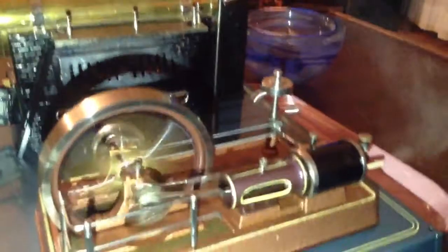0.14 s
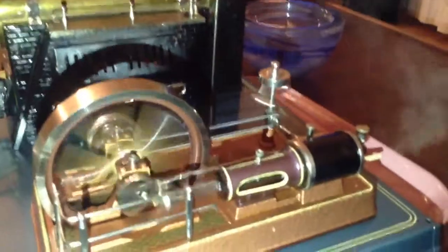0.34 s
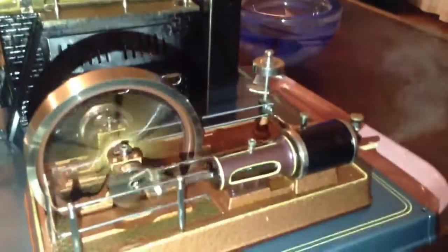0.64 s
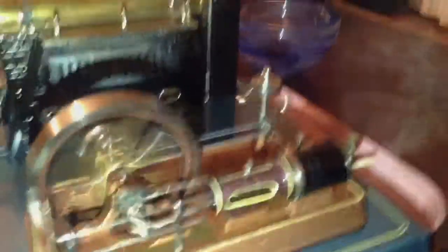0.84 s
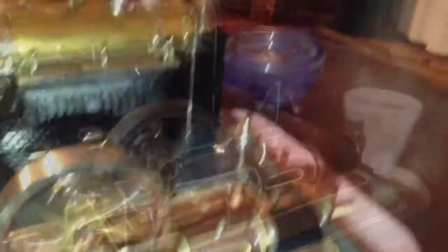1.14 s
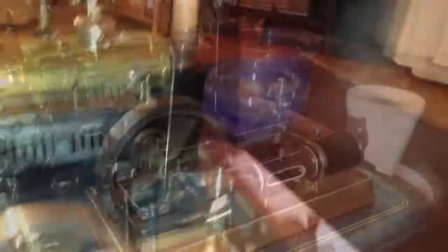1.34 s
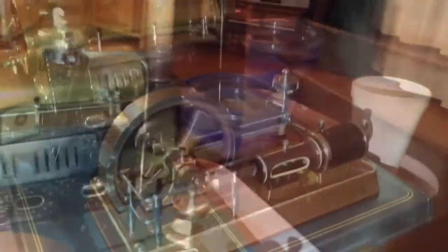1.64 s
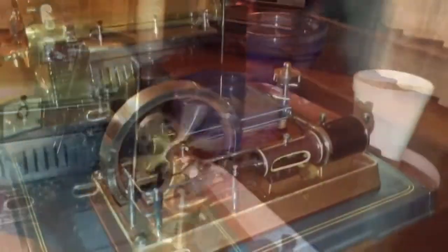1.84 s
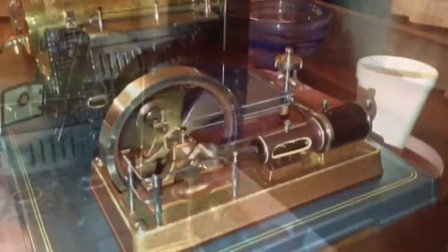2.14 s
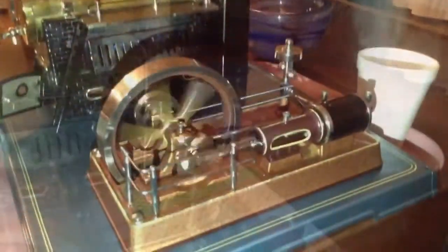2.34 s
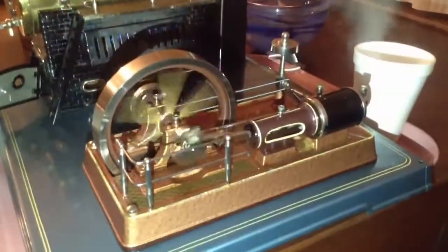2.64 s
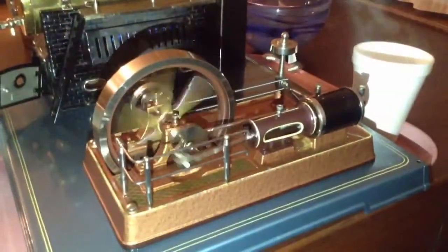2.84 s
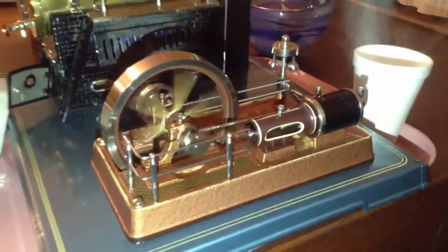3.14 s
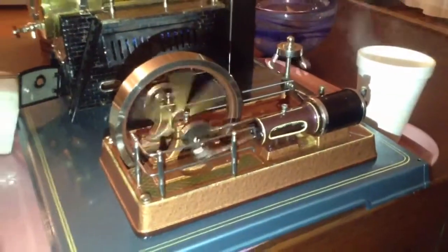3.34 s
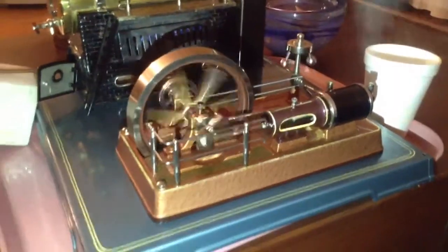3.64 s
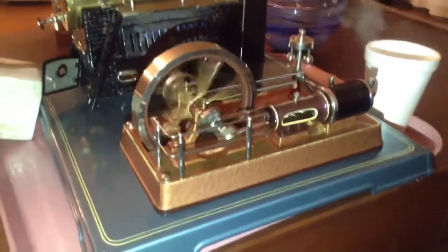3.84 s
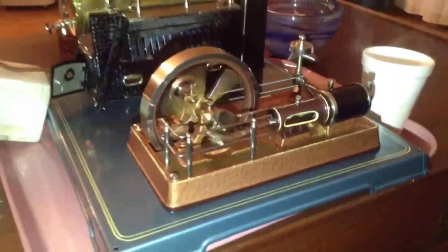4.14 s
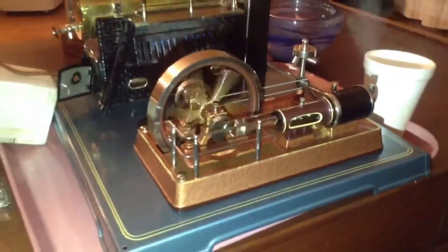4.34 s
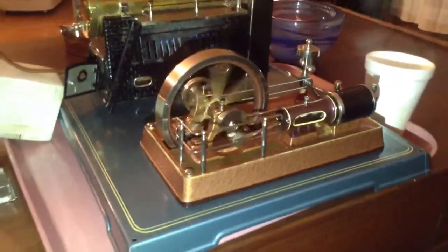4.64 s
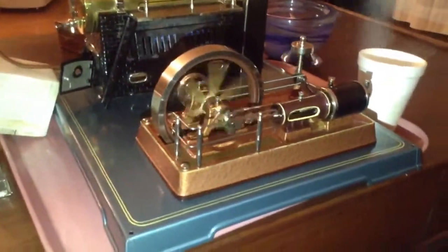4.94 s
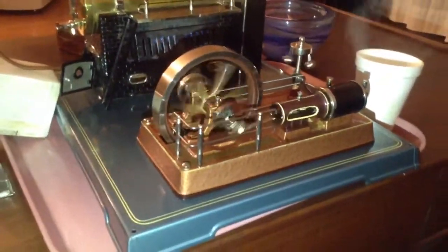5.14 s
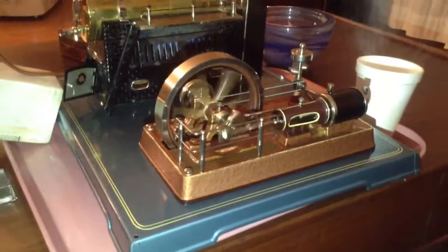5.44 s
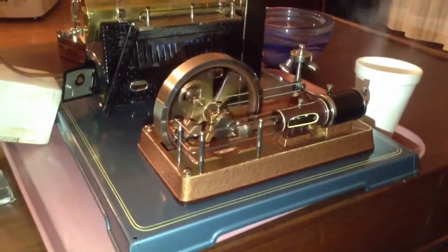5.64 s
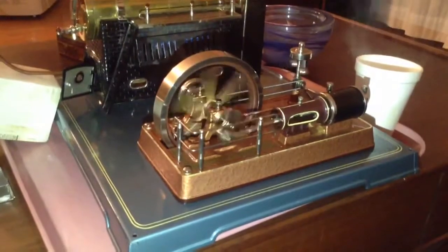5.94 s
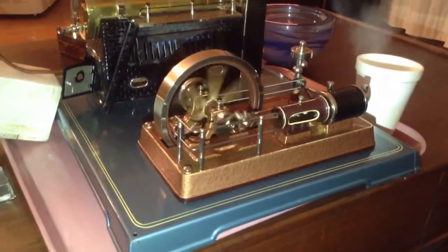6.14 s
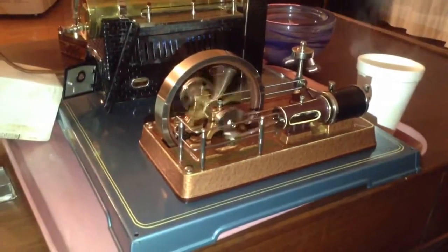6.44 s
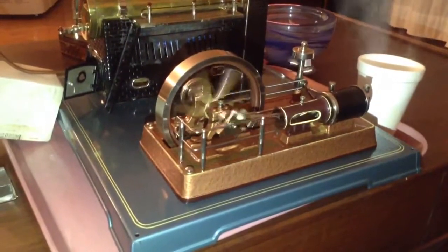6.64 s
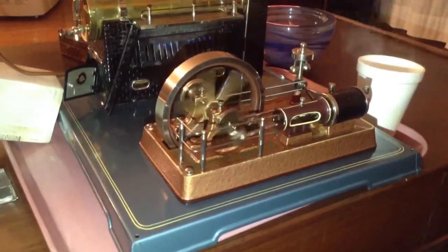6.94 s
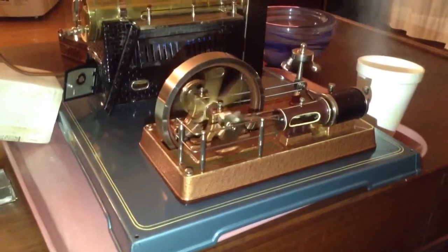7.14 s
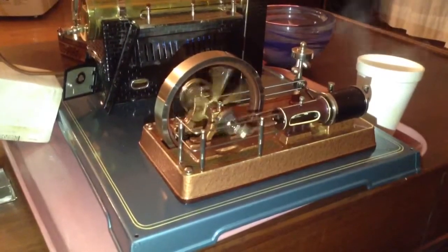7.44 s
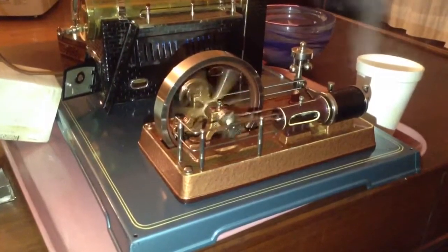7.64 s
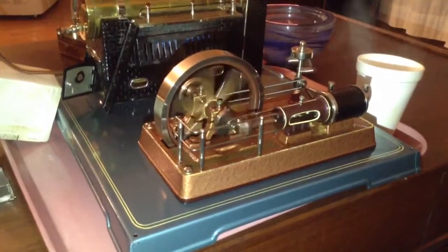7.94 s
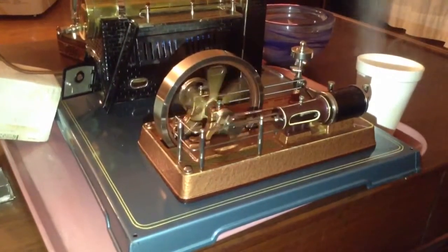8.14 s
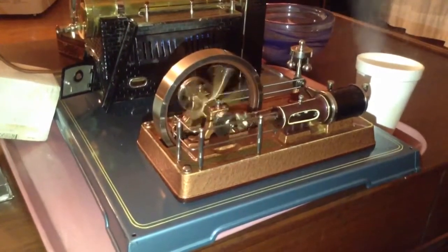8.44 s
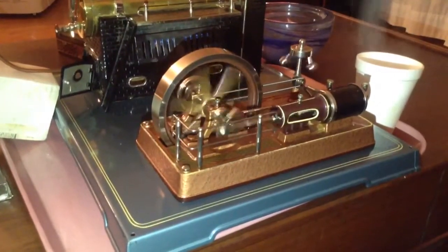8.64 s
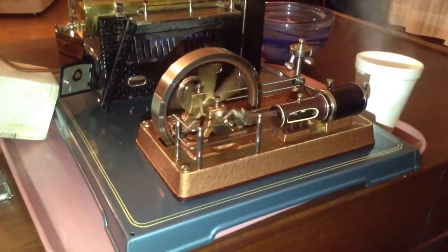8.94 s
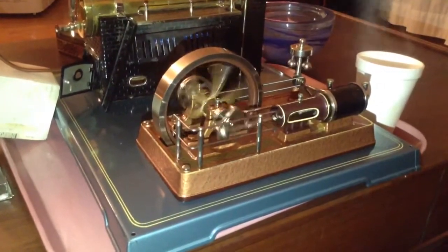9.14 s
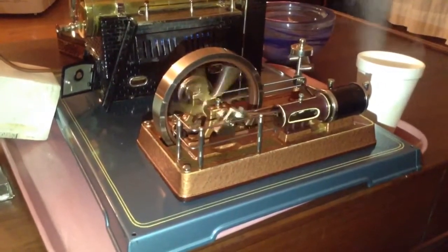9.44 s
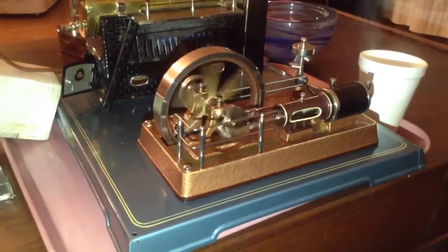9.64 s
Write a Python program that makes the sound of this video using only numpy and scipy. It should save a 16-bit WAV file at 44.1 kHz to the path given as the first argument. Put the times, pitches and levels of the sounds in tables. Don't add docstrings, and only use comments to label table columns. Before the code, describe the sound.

At 0 s a hard shove and several dull bumps shake the table, rumble dying quickly. A toy steam engine runs fast close by: whirring friction and soft-edged double metal knocks every 0.28 s, with rattles and link slaps between. From about 1.2 s exhaust steam enters, and by 2 s the fast knocking has faded out. A slower run continues to the end at nearly 10 s: every 0.45 s a hollow pipe knock, dull puff, wet crackling spit and sharp bright hiss that shuts off abruptly. From 2.2 s paired metallic clanks recur about every 0.75 s, amid rod clicks, pin ticks and fine gear ticking. A knuckle-like tap lands at 4.1 s; water snaps near 3.8, 4.6 and 8.9 s. The boiler seethes throughout; very faint distant motor revs pass at 5.7 and 8.8 s. Short room reverberation, thin bass, identical in both channels.

```python
import sys
import numpy as np
from scipy import signal
from scipy.fft import rfft, irfft, next_fast_len
from scipy.io import wavfile
from scipy.ndimage import uniform_filter1d, map_coordinates

SR = 44100
rng = np.random.default_rng(int(sys.argv[2]) if len(sys.argv) > 2 else 0)


def store_pcm(level_fs):
    pcm = np.round(np.clip(level_fs, -1, 1) * 32767).astype(np.int16)
    wavfile.write(sys.argv[1], SR, np.atleast_2d(pcm).T)


def amplitude_ratio(level_db):
    exponent = np.asarray(level_db, float) / 20
    return 10 ** exponent


N = 432164

# frequency_hz, density_db (per Hz)
RUMBLE_SPECTRUM = [(35, -68), (60, -31), (184, -1.5), (340, -9), (556, 0.5), (720, 0), (894, 0.5),
                   (1100, -3), (1430, -39), (2420, -120)]
SEETHE_SPECTRUM = [(15, -58), (25, -35), (64, -4), (221, -2.5), (378, -12.5), (523, -1.5), (614, -54),
                   (919, -5.5), (1170, -6), (4870, -3), (7100, -6.5), (12800, -8.5), (15500, -9)]
WHIRR_SPECTRUM = [(180, -1.5), (300, 0), (950, 0), (1120, -9), (1490, 4), (3230, -4.5), (4140, -4),
                  (7880, -16), (13100, -18), (15500, -30)]
CASING_SPECTRUM = [(130, -44), (220, -5.5), (310, -5.5), (450, -14.5), (700, -26.5)]
PUFF_SPECTRUM = [(60, -62), (100, -40), (150, -20), (350, -8), (900, -6), (1450, -5.5), (2300, -3.5),
                 (4500, -7.5), (6500, -12.5), (12000, -32)]
HISS_SPECTRUM = [(1760, -60), (3000, -53), (3950, -8), (5020, -8), (5880, -9.5), (9390, -4.5),
                 (11900, -3.5), (13800, -2), (14800, 1.5), (15500, -3)]
# frequency_hz, t60_s
ROOM_DECAY = [(200, 0.38), (1500, 0.32), (5000, 0.17), (14000, 0.2)]
# frequency_hz, gain_db
MIC_RESPONSE = [(20, -22), (60, -25.5), (110, -9), (170, 0)]

# frequency_hz, level_db, t60_s
TEETH_MODES = [(3030, 11, 0.015), (3700, 7, 0.013), (4900, 5, 0.0069)]
WORN_TOOTH_MODES = [(3140, 2, 0.017), (4900, -16, .012)]
TAP_MODES = [(440, -5, .03), (895, -11, 0.04), (1750, 4, .013), (2940, -4, .015), (3500, 0, .013),
             (3900, -9, .013)]
CLUTTER_MODES = [(521, -2, 0.19), (915, 2, 0.18), (1240, -9, .14), (1528, 1, 0.13), (2050, -5, .1)]
BASE_MODES = [(558, -9, .12), (700, -1.5, 0.15), (880, -3.5, .1), (1089, 0, 0.1), (1265, 3, .08)]
PLATE_MODES = [(1551, -5, 0.1), (1610, 1.5, 0.032), (1797, 1, 0.044)]
BRACKET_MODES = [(1940, -8.5, 0.052), (2120, -4, 0.039), (2347, -12.5, 0.059)]
ROD_MODES = [(2850, -7, 0.022), (3630, -0.5, .024), (4100, -4, .02), (4375, -1, .024), (4950, -1, 0.024),
             (5500, -4, 0.017), (6040, -10, 0.022)]
PIN_MODES = [(7880, 2, 0.029), (9730, -1, 0.029), (10240, -14, .015), (11080, 3, 0.019), (12600, 4, .011),
             (14560, -1, .015)]
JOINT_MODES = [(6370, -1.5, 0.023), (6700, -9, 0.023), (8150, 1, 0.016), (9400, 2.5, 0.016),
               (9850, 5.5, 0.016), (10500, -3.5, 0.012), (12560, -2, 0.019), (14240, -7, 0.015)]
CRANK_MODES = [(1470, -2, 0.018), (1810, -4, 0.041), (2190, -15, 0.031), (2280, -9, 0.02), (2910, 3, 0.018),
               (3600, -1.5, 0.021), (4560, 4, 0.013)]
CRANK_TREBLE_MODES = [(7600, 7, 0.015), (9700, -12, 0.011), (10470, 11, 0.025), (13000, 4, .015)]
KNOCK_MODES = [(1776, -5, 0.035), (2090, 0, 0.028), (2390, -4, 0.022), (2947, -2, 0.027), (4230, -10, .025),
               (4700, -11, .02), (5880, -12, 0.022)]
REBOUND_MODES = [(1500, -4, .03), (1795, 0, .035), (2040, -2, .035), (2500, -4, .025), (2955, -2, 0.025),
                 (3830, -3.5, 0.026), (4760, -1, 0.028), (6200, -4, 0.018), (9080, -9, 0.029)]
PIPE_MODES = [(915, -0.5, 0.21), (695, -7.5, 0.15), (985, -3.5, 0.11), (2780, -2, 0.015), (3900, -7, 0.05)]
POP_MODES = [(908, 0, .16), (760, -6, .05), (1000, -4, .06), (1560, -4, .02), (480, -9, .02)]
RETURN_MODES = [(914, -3, 0.35), (1014, -5, 0.23), (743, -6, 0.23), (1510, 1, 0.065), (1250, -9, .12)]

# start_s, length_s, pitch_hz, rise_hz_per_s, level_db
MOTOR_REVS = [
    (5.74, 0.15, 144.4, 33.2, -64),
    (8.83, 0.4, 138.6, 36.7, -65.5),
]
# time_s, level_db
TABLE_SHAKING = [(0, -67), (1, -61.5), (1.4, -61), (2.2, -66.5), (3, -67.5), (4.8, -65), (5.3, -64),
                 (9.8, -69.5)]
# start_s, level_db, fall_db_per_s, length_s
SHOVES = [
    (0, -39.5, 66, 0.14),
    (3.5, -61.5, 30, 0.069),
    (1.442, -52, 40, .045),
    (1.64, -55.5, 10, .04),
    (1.06, -55, 30, .06),
]
# time_s, level_db
BOILER_PRESSURE = [(0, -52), (.6, -51), (1.4, -52), (2.2, -56.5), (4, -51.5), (4.4, -56), (5.6, -54),
                   (6.5, -55.5), (9.8, -56.5)]
# time_s, level_db
FAST_LEVEL = [(0, -52), (1, -49), (1.4, -51.5), (2.2, -63), (3, -73), (4, -90)]
# start_s, peak_db
WORN_TICKS = [(7.005, -46), (7.363, -50), (7.3906, -46), (7.4235, -44), (7.4644, -48), (8.1858, -47),
              (8.2511, -53), (8.8089, -46), (8.8543, -56), (9.5512, -41), (9.596, -45), (9.6455, -45),
              (9.6749, -47), (9.7388, -51)]
# start_s, peak_db, pitch_hz, t60_s
BUMPS = [(.009, -34, 177, 0.14), (0.0398, -21, 630, 0.013), (.064, -31.5, 766, 0.066),
         (.094, -36, 860, .07), (0.623, -39.5, 199, 0.27), (1.139, -42.5, 267, 0.072),
         (1.602, -45, 716, 0.088), (3.315, -44, 242, 0.091), (4.1074, -34, 490, 0.031),
         (4.465, -45, 340, 0.06), (4.639, -51, 90, 0.063), (5.364, -43, 420, 0.016)]
# start_s, base_db, plate_db
AFTER_RINGS = [(2.18, -45, -44), (2.943, -43, -52), (3.734, -40, -33), (3.755, -40, -31), (3.776, -41, -38),
               (5.222, -36, -35), (5.25, -38, -38), (6.012, -47, -50), (6.029, -42, -48), (7.491, -39, -41),
               (8.314, -45, -48), (9.087, -43, -44)]
POPS_DB = [-47, -46, -48, -41, -41, -45, -44, -42, -46, -43, -44, -46, -47, -45, -47, -41, -45]
# start_s, peak_db
RETURNS = [
    (2.45, -50),
    (3.268, -45),
    (5.542, -50),
    (6.40, -54),
    (7.249, -56),
    (7.82, -48),
]
# start_s, peak_db, pitch_hz, thud_db
SNAPS = [
    (3.785, -31, 6850, -35),
    (4.6055, -30.5, 7600, -20),
    (4.774, -35, 1500, -7),
    (5.366, -39, 1200, -7),
    (8.9082, -29.5, 7800, -14),
    (4.7465, -40, 4200, -30),
    (2.564, -36, 6200, -30),
    (8.982, -39, 1100, 0),
    (9.055, -41, 1700, -4),
    (9.067, -37, 1000, 1),
]
# start_s, peak_db, plate_db, bracket_db, rod_db
CLANKS = [(2.1794, -20, -19, -25, -21), (2.197, -25, -15, -22, -20), (3.732, -13, -21, -25, -26),
          (3.7542, -17, -22, -20, -20), (4.5192, -25.5, -25, -19, -18), (5.221, -15.5, -20, -28, -26),
          (5.2352, -19, -24, -18, -19), (6.0111, -19.5, -31, -26, -19.5), (6.0278, -24.5, -21, -19, -17),
          (6.794, -35, -28, -16, -16), (6.8099, -31, -18, -15.5, -15), (7.4904, -14, -27, -19, -17),
          (7.5074, -17, -21, -19, -20), (8.312, -29.5, -21, -16, -19), (8.3206, -29.5, -17, -14.5, -16),
          (9.0857, -23, -18.5, -22, -30), (9.1057, -24, -22, -15, -20)]
# start_s, peak_db, dull_db, loudest_rod_hz
CLICKS = [(2.132, -39, -12, 4390), (2.245, -29, -19, 3190), (2.48, -39, -10, 3800), (2.59, -43, -13, 6040),
          (2.6172, -32.5, -3, 3550), (2.9421, -23.5, -16, 2140), (3.0344, -28.5, -13, 4900),
          (3.374, -37, -4.5, 4000), (3.4497, -31, -10, 4800), (3.8258, -28.5, -13, 3650),
          (6.399, -43, -7, 2050), (4.584, -27, -23, 4900), (4.793, -26.5, -12, 6240),
          (4.963, -32.5, -17, 4900), (5.3138, -31, -15, 3830), (6.094, -29, -20, 4820),
          (6.5078, -33, -23, 3140), (6.857, -29, -24, 3630), (7.073, -31, -16, 5260), (7.164, -38, 0, 4000),
          (7.249, -36, -12, 3280), (7.587, -30.5, -16, 5100), (7.9977, -33, -15, 3620),
          (8.3964, -26, -17, 4950), (8.4683, -32, -23, 4640), (9.1499, -26, -16.5, 4900),
          (9.41, -42, -7, 4630)]
# start_s, peak_db, loudest_rod_hz
FAINT_TICKS = [(2.4064, -40, 3600), (2.426, -41, 4900), (2.449, -39, 3920), (2.498, -41, 4300),
               (2.553, -40, 4430), (2.836, -43, 3700), (3.3164, -36.5, 4330), (3.3348, -36, 3640),
               (4.1694, -37, 3850), (4.2128, -37.5, 4320), (4.2526, -43, 3570), (4.7794, -43, 4700),
               (5.5832, -42, 4850), (5.639, -36, 2850), (5.7074, -42, 4430), (4.118, -35, 2950),
               (6.357, -42, 4900), (6.376, -44, 4800), (6.455, -43, 4870), (6.476, -42, 4700),
               (7.2576, -36, 3020), (7.851, -41.5, 3070), (7.8927, -40, 3100), (8.6784, -41, 4820),
               (8.761, -41, 4960), (8.9424, -41, 4600), (9.3093, -44, 4910), (9.3333, -44, 4370)]
# start_s, peak_db, bright_db
SLAPS = [(0.3085, -30, -16), (0.357, -41, -10), (0.376, -41, -10), (0.42, -37, -18), (0.566, -29.5, -21),
         (0.667, -36, -15), (0.856, -28.5, -6), (1.119, -38, -17), (1.2487, -38, -16), (1.441, -29, -14),
         (1.459, -38, -6), (1.797, -39, -10), (1.86, -36, -15), (2.063, -42, -5)]
# knock_s, knock_db, rebound_delay_s, rebound_db
TURNS = [
    (0.1876, -22, 0.0315, -22.5),
    (0.4717, -22, 0.028, -24.5),
    (0.755, -22, 0.024, -28.5),
    (1.0383, -24, 0.029, -25),
    (1.321, -25, 0.038, -50),
    (1.603, -25, 0.029, -28),
    (1.8839, -28.5, 0.029, -31.5),
]
# start_s, peak_db, t60_s
SPITS = [(2.1331, -23, 0.032), (2.586, -28, 0.035), (3.028, -30, 0.038), (4.795, -28, 0.035),
         (5.7074, -39, 0.035), (6.611, -28, 0.035), (7.0728, -36, 0.035), (7.9982, -33, 0.035),
         (8.4687, -28, 0.035), (8.4734, -27, 0.035), (8.9421, -41, 0.035), (8.9514, -40, 0.035),
         (9.409, -29, 0.035)]
# start_s, steam_db, spit_db, casing_boom_db
STROKES = [(1.223, -12, 13, -64), (1.664, -5, -5, -67), (2.102, -2, 11, -76), (2.544, 0.5, 12, -60.5),
           (2.981, -0.5, 8, -56.5), (3.426, -1.5, 10, -55.5), (3.868, -1.5, 16, -66),
           (4.315, -0.7, 5.5, -56), (4.762, -0.5, 13, -61), (5.213, -1, 16, -60), (5.662, -0.1, 7, -61),
           (6.115, -0.5, 2, -57), (6.571, -1.5, 12.5, -63), (7.03, -0.5, 7, -58), (7.49, -0.5, 2, -73),
           (7.954, -1.5, 6, -63.5), (8.42, -0.7, 7, -74), (8.89, -0.5, 8, -57), (9.358, -1, 5.5, -66)]


def unit(x):
    return x / np.sqrt(np.mean(x ** 2) + 1e-20)


def along(points, hz):
    f, v = np.transpose(points)
    return np.interp(np.log(hz + 1), np.log(f + 1), v)


def curve(points):
    s, value = np.transpose(points)
    return np.interp(np.arange(N) / SR, s, value)


def wobble(rate):
    knots = rng.standard_normal(int(N * rate / SR) + 4)
    return map_coordinates(knots, [np.arange(N) * rate / SR])


def rush(spectrum, patchy_db, ripple_db):
    hz, _, z = signal.stft(rng.standard_normal(N), SR, nperseg=2048)
    patches = uniform_filter1d(uniform_filter1d(rng.standard_normal(z.shape), 16, 0), 3, 1)
    ripple = uniform_filter1d(rng.standard_normal(len(hz)), 2)
    colour_db = along(spectrum, hz) + ripple_db * unit(ripple)
    z = z * amplitude_ratio(patchy_db * unit(patches) + colour_db[:, None])
    return unit(signal.istft(z, nperseg=2048)[1][:N])


def add(track, s, sound):
    part = track[max(round(s * SR), 0):][:len(sound)]
    part += sound[:len(part)]


def ring(modes, attack, rough, detune, crack):
    hz, db, t60 = np.transpose(modes)[:, :, None]
    t = np.arange(int(SR * min(t60.max(), 0.1))) / SR
    tuning, phase, strength = rng.standard_normal((3, len(modes), 1))
    tones = np.sin(2 * np.pi * hz * (1 + detune * tuning) * t + 3 * phase)
    chatter = rng.standard_normal(tones.shape)
    for _ in range(2):
        chatter = uniform_filter1d(chatter, size=20, axis=1)
    tones = tones * (1 + 7 * chatter * (rough + crack * amplitude_ratio(-60 * t / 0.017)))
    blow = np.sum(amplitude_ratio(db + 2 * strength - 60 * t / t60) * tones, 0)
    blow = blow * (1 - np.exp(-(t / attack) ** 2))
    return blow / np.abs(blow).max()


def far_motor():
    t, out = np.arange(N) / SR, np.zeros(N)
    for s, length, hz, rise, db in MOTOR_REVS:
        fade_db = 200 * np.maximum(s - t, 0) + 41 * np.maximum(t - s - length, 0)
        phase = 2 * np.pi * (hz + rise * (t - s) / 2) * (t - s) + 0.72 * wobble(11)
        out += amplitude_ratio(db - fade_db) * np.sin(phase)
    return out * amplitude_ratio(2.7 * wobble(22))


def table_rumble():
    t, shake = np.arange(N) / SR, amplitude_ratio(curve(TABLE_SHAKING))
    for s, db, fall_db, length in SHOVES:
        stop_db = 200 * np.maximum(t - s - length, 0)
        shake += (t >= s) * amplitude_ratio(db - fall_db * np.abs(t - s) - stop_db)
    unsteady = amplitude_ratio(wobble(6.6) + 1.5 * wobble(50))
    return shake * unsteady * rush(RUMBLE_SPECTRUM, patchy_db=1.2, ripple_db=2.0)


def boiler_seethe():
    level_db = curve(BOILER_PRESSURE) + 1.2 * wobble(13)
    return amplitude_ratio(level_db) * rush(SEETHE_SPECTRUM, patchy_db=1.66, ripple_db=2.0)


def whirr():
    t, turn_s = np.arange(N) / SR, 0.283
    since_knock = (t - TURNS[0][0]) % turn_s
    swell = amplitude_ratio(curve(FAST_LEVEL) + 3 - 40 * since_knock)
    swell += amplitude_ratio(-38.5 - 87 * t)
    return swell * amplitude_ratio(2 * wobble(120)) * rush(WHIRR_SPECTRUM, patchy_db=2.0, ripple_db=4.0)


def gears():
    out, starts = np.zeros(N), np.transpose(STROKES)[0]
    starts = np.append(starts, 2 * starts[-1] - starts[-2])
    teeth = np.interp(np.arange(14 * len(STROKES)) / 14, np.arange(len(starts)), starts)
    for s in teeth:
        tick = ring(TEETH_MODES, attack=0.00031, rough=0.13, detune=0.037, crack=0.34)
        add(out, s + rng.normal(0, 0.0024), amplitude_ratio(rng.uniform(-52, -51)) * tick)
    for s, db in WORN_TICKS:
        tick = ring(WORN_TOOTH_MODES, attack=0.00056, rough=0.1, detune=0.015, crack=0.3)
        add(out, s, amplitude_ratio(db + 0.5) * tick)
    return out


def bumps():
    out, tap_s = np.zeros(N), 4.1074
    tap = ring(TAP_MODES, attack=0.0005, rough=0.24, detune=0.01, crack=0.44)
    clutter = ring(CLUTTER_MODES, attack=0.011, rough=1.4, detune=0.02, crack=0)
    add(out, tap_s, amplitude_ratio(-29.5) * tap)
    add(out, tap_s, amplitude_ratio(-36.5) * clutter)
    for s, db, hz, t60 in BUMPS:
        modes = [(hz, 0, t60), (1.48 * hz, -9, 0.5 * t60), (2.1 * hz, -14, t60), (3300, -30, 0.02)]
        add(out, s, amplitude_ratio(db) * ring(modes, attack=0.00104, rough=0.044, detune=0.019, crack=0.11))
    return out


def base():
    out = np.zeros(N)
    plate_modes = PLATE_MODES[:2] + [(1700, -1, 0.072)]
    for s, base_db, plate_db in AFTER_RINGS:
        wood = ring(BASE_MODES, attack=0.0035, rough=0.71, detune=0.031, crack=0.2)
        plate = ring(plate_modes, attack=0.001, rough=0.23, detune=0.0062, crack=0.22)
        add(out, s, amplitude_ratio(base_db) * wood)
        add(out, s, amplitude_ratio(plate_db) * plate)
    return out


def pipe_resonance():
    out = np.zeros(N)
    for row, db in zip(STROKES[2:], POPS_DB):
        add(out, row[0], amplitude_ratio(db) * ring(POP_MODES, attack=0.0008, rough=0.17, detune=0.0034, crack=0.34))
    for s, db in RETURNS:
        add(out, s, amplitude_ratio(db) * ring(RETURN_MODES, attack=0.005, rough=0.55, detune=0.01, crack=0.1))
    return out


def snaps():
    out = np.zeros(N)
    for s, db, hz, thud_db in SNAPS:
        modes = [(hz, 0, 0.004), (0.56 * hz, -4, 0.004), (1.47 * hz, -4, 0.003), (800, thud_db, 0.012)]
        add(out, s, amplitude_ratio(db) * ring(modes, attack=0.00014, rough=0.05, detune=0.02, crack=0.26))
    return out


def clicks():
    out = np.zeros(N)
    for s, db, *shares_db in CLANKS:
        joint = ring(JOINT_MODES, attack=0.0013, rough=0.27, detune=0.0092, crack=0.55)
        add(out, s, amplitude_ratio(db - 5) * joint)
        for share_db, modes in zip(shares_db, (PLATE_MODES, BRACKET_MODES, ROD_MODES)):
            part = ring(modes, attack=0.0006, rough=0.28, detune=0.008, crack=0.8)
            add(out, s, amplitude_ratio(db + share_db + 8) * part)
    # start_s, peak_db, dull_db, loudest_rod_hz, bright_db
    blows = [(*row, -7) for row in CLICKS]
    blows += [(s, db, -11.5, hz, -9) for s, db, hz in FAINT_TICKS]
    for s, db, dull_db, hz, bright_db in blows:
        rod = ring(ROD_MODES + [(hz, 4, 0.02)], attack=0.0005, rough=0.26, detune=0.008, crack=0.65)
        dull = ring(PLATE_MODES + BRACKET_MODES, attack=0.0006, rough=0.28, detune=0.013, crack=0.32)
        pin = ring(PIN_MODES, attack=0.00074, rough=0.34, detune=0.016, crack=0.85)
        add(out, s, amplitude_ratio(db - 3.5) * rod)
        add(out, s, amplitude_ratio(db + dull_db + 1) * dull)
        add(out, s, amplitude_ratio(db + bright_db - 0.5) * pin)
    return signal.sosfilt(signal.butter(4, 1200, "high", fs=SR, output="sos"), out)


def crank():
    out = np.zeros(N)
    slap_modes = CRANK_MODES + [(1250, 3, 0.022)]
    rattle_modes = CRANK_MODES + [(1312, 3, 0.022)]
    knocks = [(s, db, slap_modes, bright_db) for s, db, bright_db in SLAPS]
    for s, db, rebound_s, rebound_db in TURNS:
        knocks.append((s, db, KNOCK_MODES, -11.5))
        knocks.append((s + rebound_s, rebound_db, REBOUND_MODES, -18))
        for delay_s, less_db in ((0.208, -17), (0.078, -17.5)):
            rattle_s = s + delay_s + rng.normal(0, 0.0032)
            knocks.append((rattle_s, db + less_db + rng.normal(0, 2.2), rattle_modes, -21))
    for s, db, modes, bright_db in knocks:
        body = ring(modes, attack=0.002, rough=0.45, detune=0.008, crack=0.7)
        treble = ring(CRANK_TREBLE_MODES, attack=0.00056, rough=1.0, detune=0.0077, crack=2.1)
        add(out, s, amplitude_ratio(db - 3) * body)
        add(out, s, amplitude_ratio(db + bright_db) * treble)
    return out


def sputter():
    starts, t = np.transpose(STROKES[2:])[0], np.arange(SR // 250) / SR
    count = int(260 * 0.2 * len(starts))
    stroke, delay, pitch, size = rng.random((4, count, 1))
    when = starts[(stroke * len(starts)).astype(int)] + 0.19 * delay ** 1.5
    hz = 1500 * 8 ** pitch
    db = -45.5 - 3.5 * np.log(size + 0.0081)
    grains = amplitude_ratio(db) * np.sin(2 * np.pi * hz * t) * np.exp(-hz * t / 1.27)
    at = np.round(when * SR).astype(int) + np.arange(len(t))
    return np.bincount(at.ravel(), grains.ravel(), N)[:N]


def valve(t, open_s, leak_db, open_db, sag_db, shut_db, fall_db):
    leak_s, crack_s, settle_s, close_s = 0.013, 0.0037, 0.018, 0.032
    shut = open_s + close_s / 2
    times = [-leak_s, -crack_s, 0, settle_s, shut - close_s, shut]
    levels = [leak_db, leak_db + 13, open_db, 0, sag_db, shut_db]
    return np.interp(t, times, levels) - fall_db * np.maximum(t - shut, 0)


def exhaust():
    (hiss, puff, boom, pipe), t = np.zeros((4, N)), np.arange(-SR // 50, SR * 2 // 5) / SR
    open_lengths = 0.42 * np.gradient(np.transpose(STROKES)[0])
    late = t - 0.048
    spit_shape = np.exp(-np.abs(late) / np.where(late < 0, 0.008, 0.018))
    for (s, db, spit_db, boom_db), open_s in zip(STROKES, open_lengths):
        spit = spit_db * spit_shape
        hiss_db = valve(t, open_s, leak_db=-23, open_db=-6.5, sag_db=-1, shut_db=-8, fall_db=227)
        puff_db = valve(t, open_s, leak_db=-34, open_db=0.6, sag_db=-3, shut_db=-8.5, fall_db=240)
        add(hiss, s + t[0], amplitude_ratio(-41 + db + 0.6 * spit + hiss_db))
        add(puff, s + t[0], amplitude_ratio(-48 + db + 0.4 * spit + puff_db))
        add(boom, s + t[0] + 0.0143, amplitude_ratio(boom_db + puff_db))
        knock = ring(PIPE_MODES, attack=0.00033, rough=0.022, detune=0.0018, crack=0.12)
        slap_back = ring(PIPE_MODES, attack=0.00078, rough=0.056, detune=0.0022, crack=0.2)
        add(pipe, s, amplitude_ratio(-40.5 + db) * knock)
        add(pipe, s + 0.077, amplitude_ratio(-42 + 1.7 * db) * slap_back)
    after = t[t >= 0]
    for s, db, t60 in SPITS:
        add(hiss, s, amplitude_ratio(db - 9 - 60 * after / t60) * np.minimum(after / 0.0015, 1))
    flutter = 0.5 * wobble(60) + 0.78 * wobble(500)
    hiss = hiss * amplitude_ratio(flutter) * rush(HISS_SPECTRUM, patchy_db=1.1, ripple_db=2.4)
    puff = puff * amplitude_ratio(flutter + 1.2 * wobble(40)) * rush(PUFF_SPECTRUM, patchy_db=1.3, ripple_db=2.5)
    boom = boom * amplitude_ratio(1.2 * wobble(30)) * rush(CASING_SPECTRUM, patchy_db=0.2, ripple_db=2.5)
    return pipe + hiss + puff + boom


def room(x):
    hz, t, z = signal.stft(x, SR, nperseg=256)
    keep = amplitude_ratio(-120 * (t[1] - t[0]) / along(ROOM_DECAY, hz))
    spread = uniform_filter1d(np.abs(z) ** 2, size=9, axis=1, origin=4)
    spread = uniform_filter1d(spread, size=3, axis=0)
    energy = [signal.lfilter([0, 0, 1 - k], [1, -k], p) for k, p in zip(keep, spread)]
    noise = signal.stft(rng.standard_normal(N), nperseg=256)[2]
    return signal.istft(np.sqrt(energy) * noise / np.abs(noise).mean(), nperseg=256)[1][:N]


def scene():
    background = far_motor() + table_rumble() + boiler_seethe() + whirr() + gears()
    struck = bumps() + base() + pipe_resonance() + snaps() + clicks()
    fast = crank()
    steam = sputter() + exhaust()
    echo = room(struck + amplitude_ratio(-1.5) * fast + amplitude_ratio(-4) * steam)
    mono = background + struck + fast + steam + amplitude_ratio(-8) * echo
    return np.array([mono, mono])


def low_pass(x):
    return signal.sosfilt(signal.butter(12, 16470, fs=SR, output="sos"), x)


def record(dry):
    size = next_fast_len(N + SR // 10)
    hz = np.fft.rfftfreq(size, 1 / SR)
    gain = (hz < 15350) * amplitude_ratio(along(MIC_RESPONSE, hz))
    mix = irfft(rfft(dry, size) * gain, size)[:, :N]
    return low_pass(mix)


dry = scene()
out = record(dry)
store_pcm(out)
```